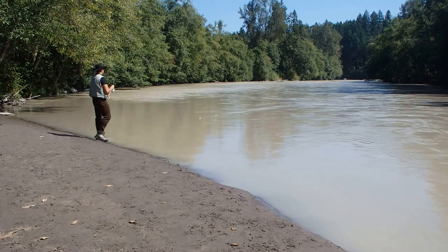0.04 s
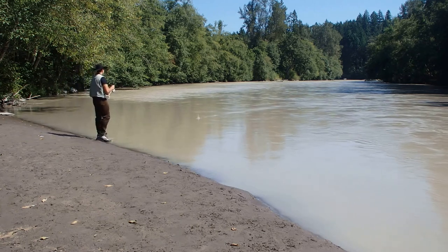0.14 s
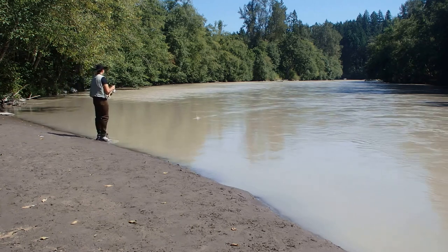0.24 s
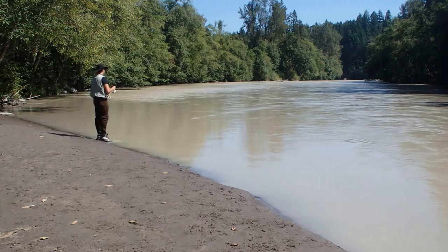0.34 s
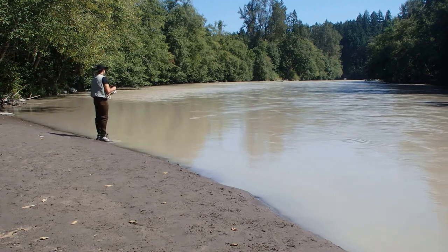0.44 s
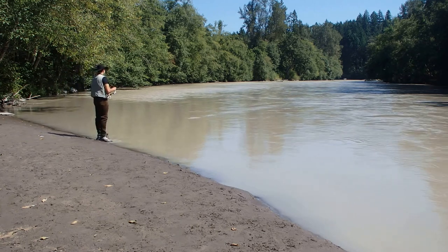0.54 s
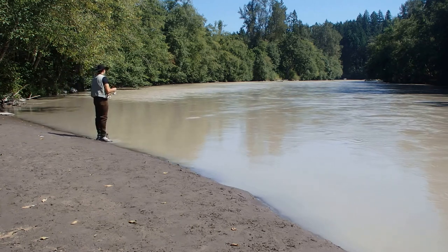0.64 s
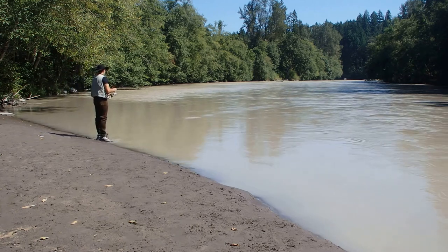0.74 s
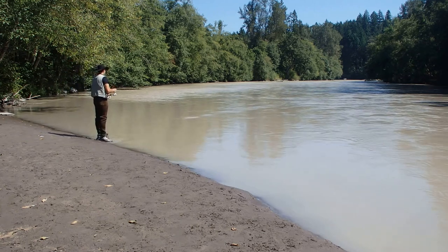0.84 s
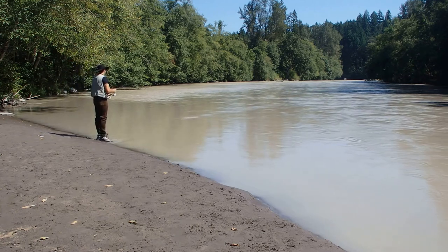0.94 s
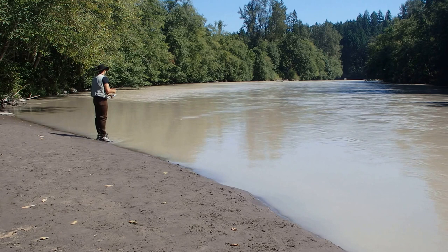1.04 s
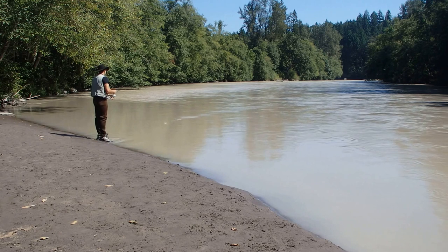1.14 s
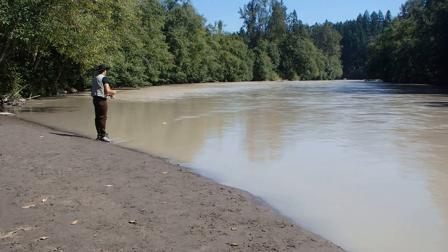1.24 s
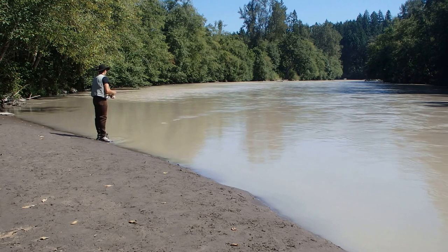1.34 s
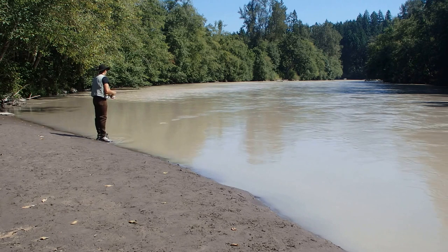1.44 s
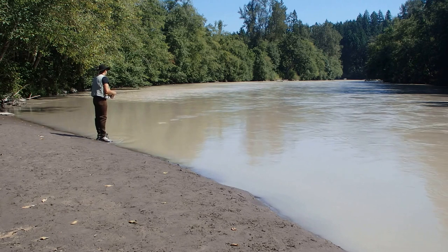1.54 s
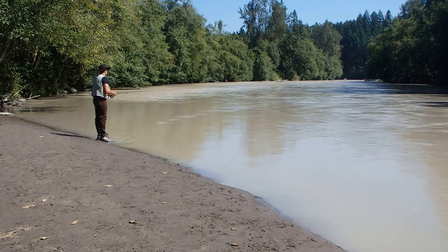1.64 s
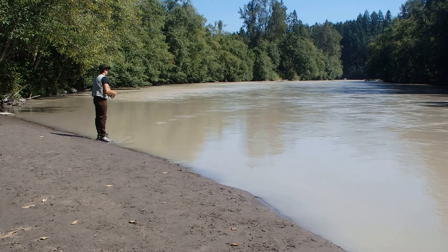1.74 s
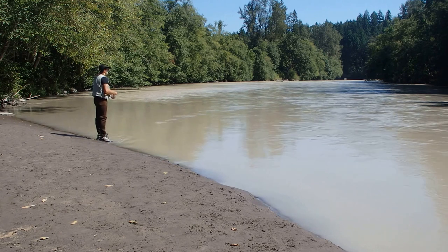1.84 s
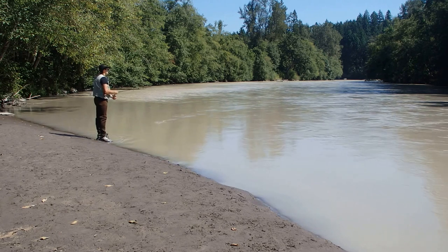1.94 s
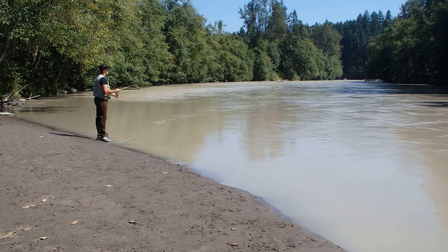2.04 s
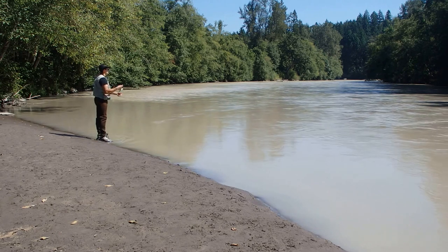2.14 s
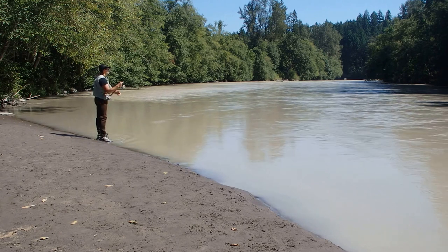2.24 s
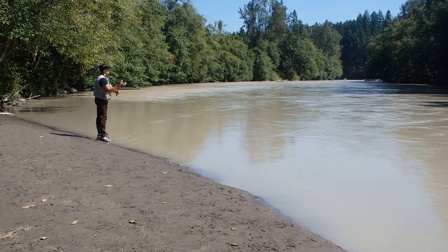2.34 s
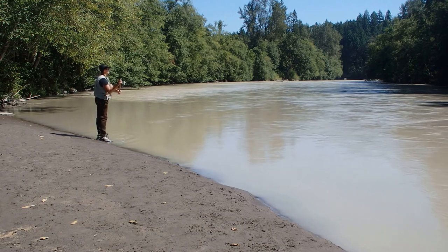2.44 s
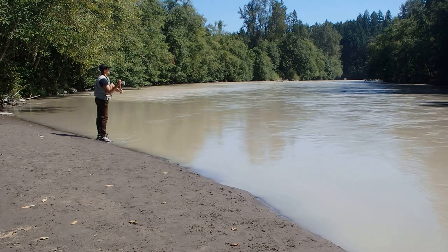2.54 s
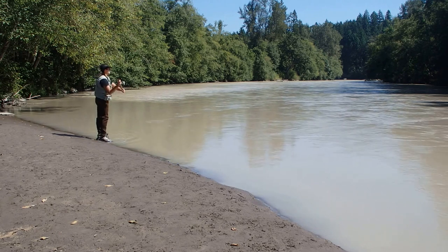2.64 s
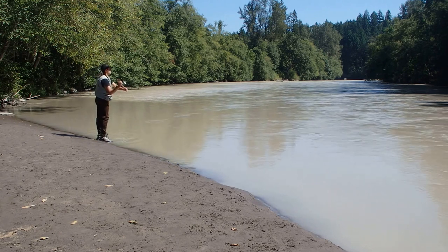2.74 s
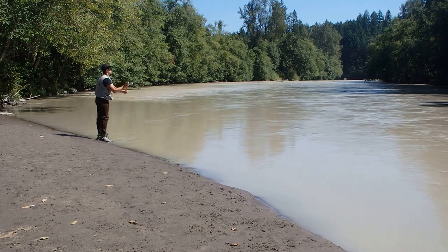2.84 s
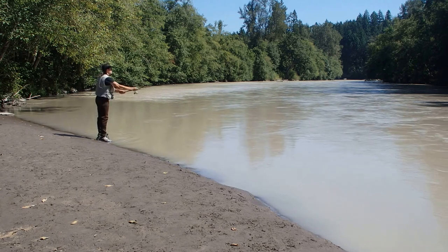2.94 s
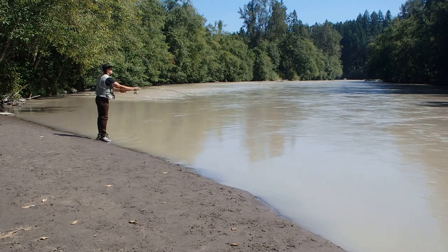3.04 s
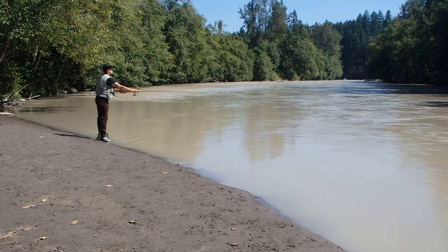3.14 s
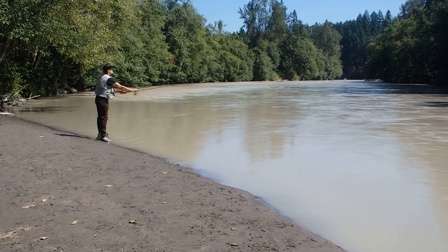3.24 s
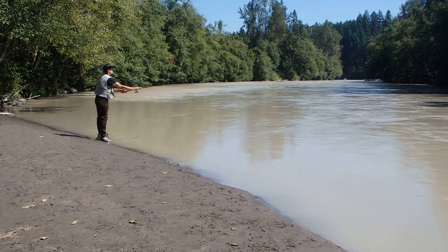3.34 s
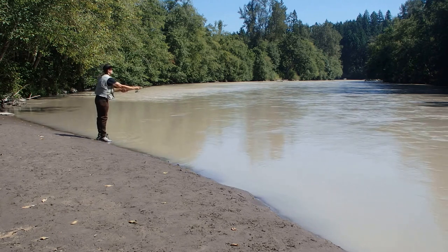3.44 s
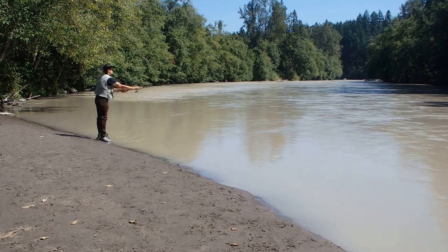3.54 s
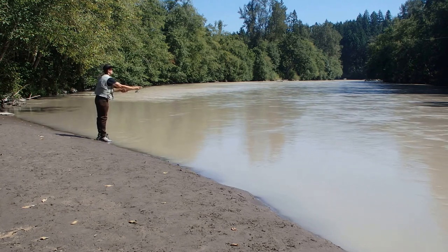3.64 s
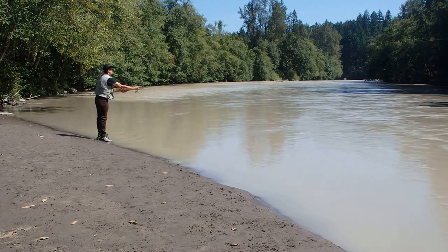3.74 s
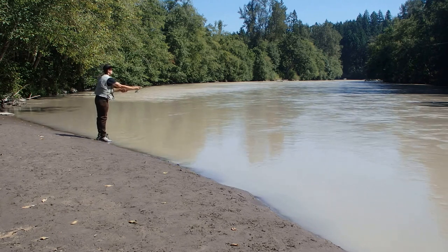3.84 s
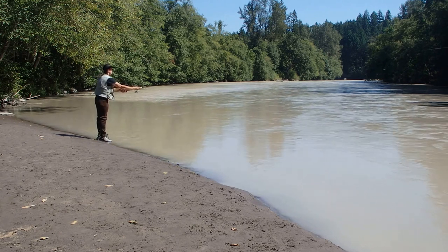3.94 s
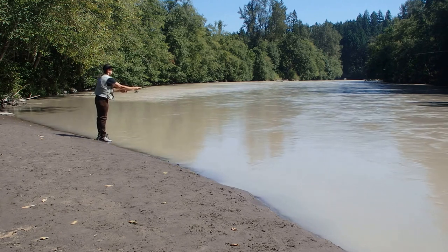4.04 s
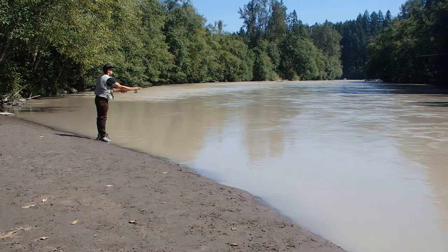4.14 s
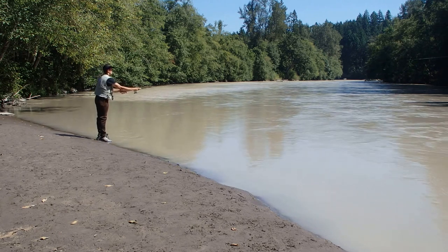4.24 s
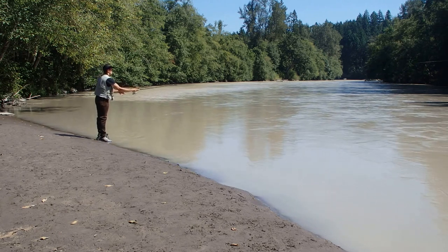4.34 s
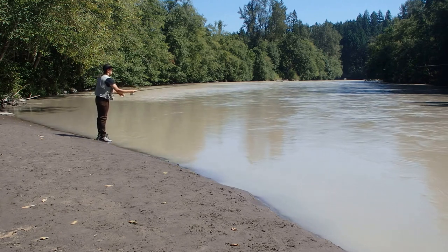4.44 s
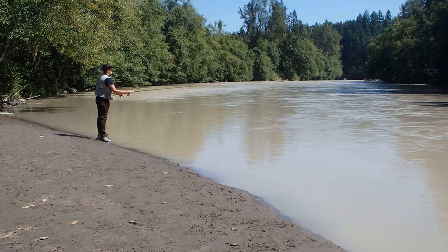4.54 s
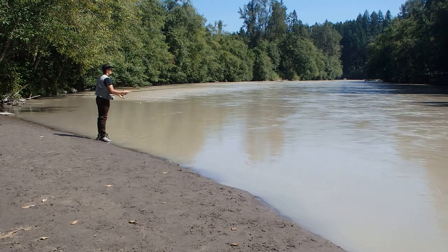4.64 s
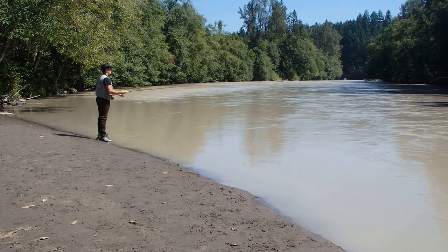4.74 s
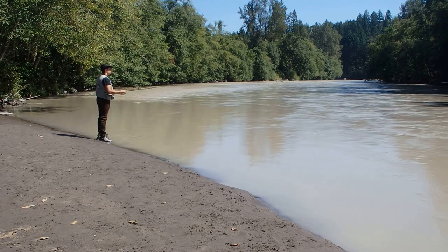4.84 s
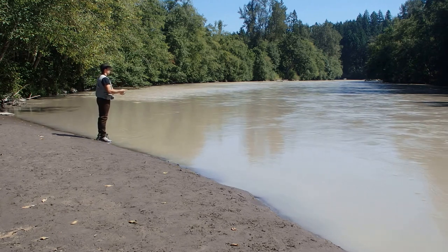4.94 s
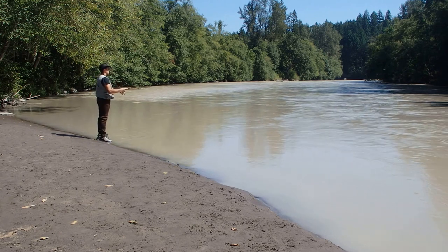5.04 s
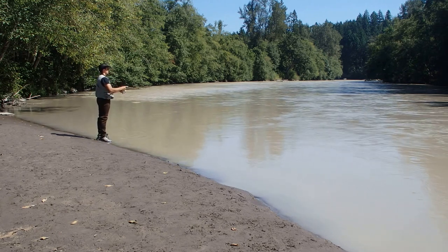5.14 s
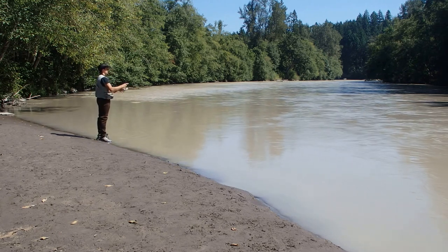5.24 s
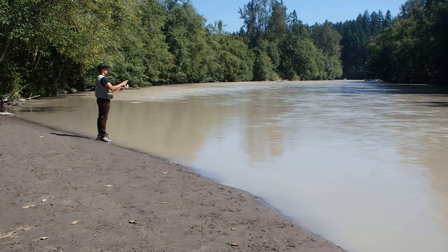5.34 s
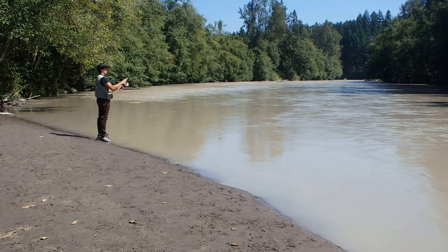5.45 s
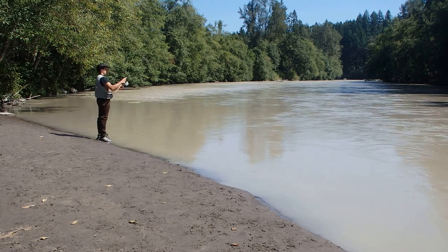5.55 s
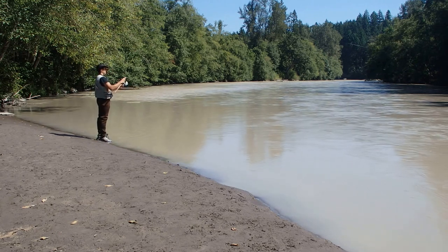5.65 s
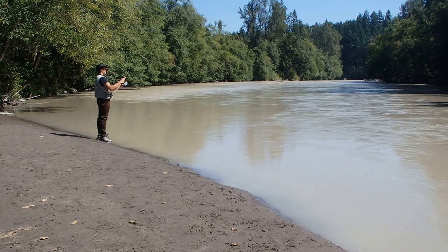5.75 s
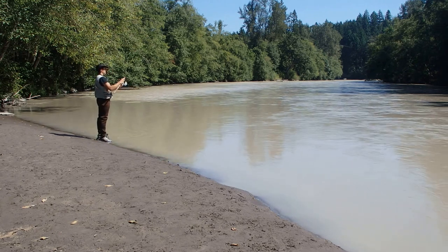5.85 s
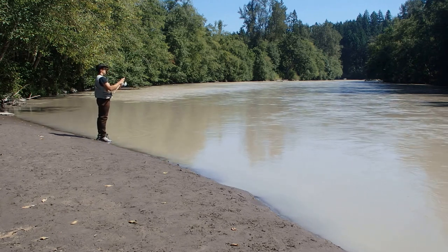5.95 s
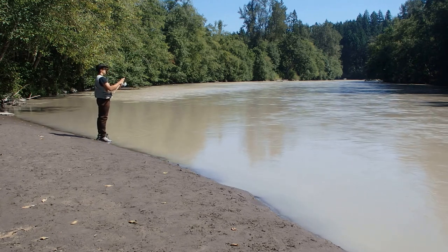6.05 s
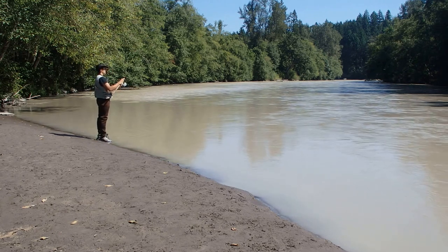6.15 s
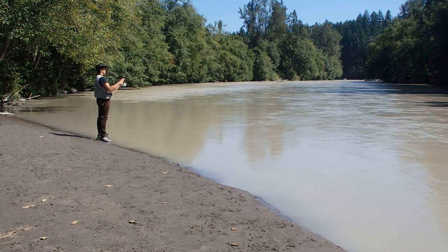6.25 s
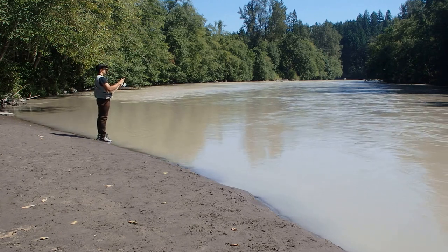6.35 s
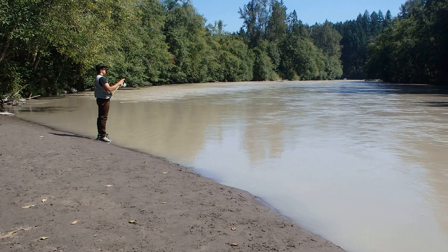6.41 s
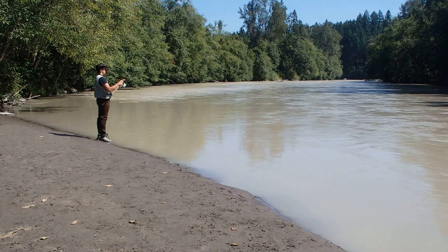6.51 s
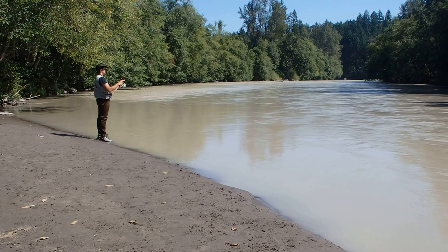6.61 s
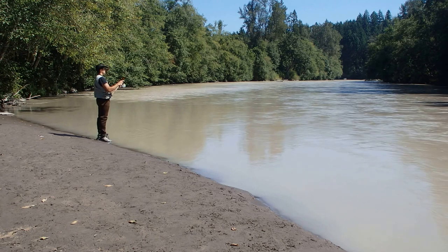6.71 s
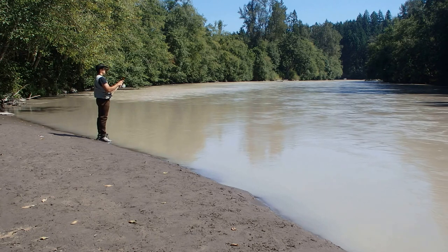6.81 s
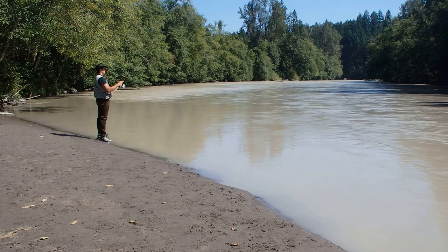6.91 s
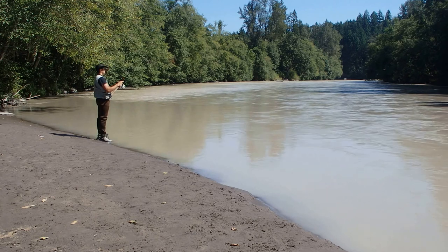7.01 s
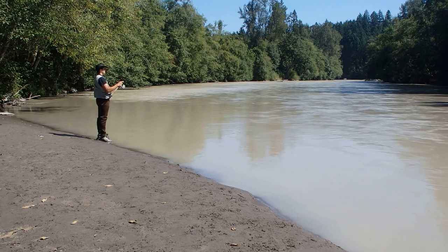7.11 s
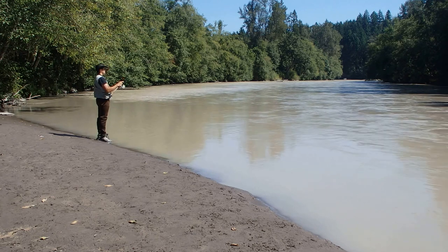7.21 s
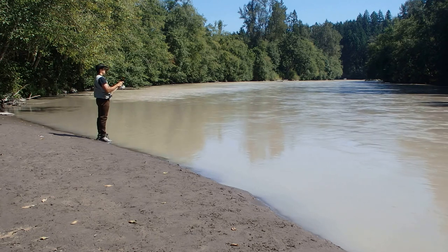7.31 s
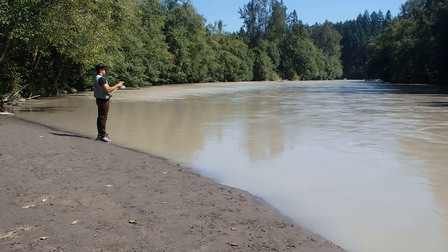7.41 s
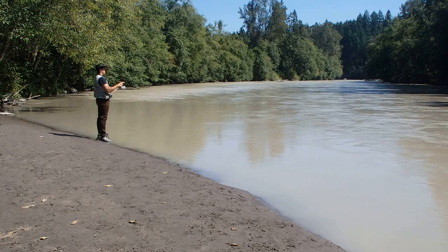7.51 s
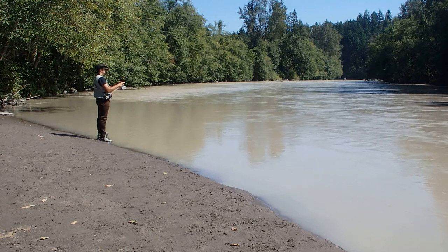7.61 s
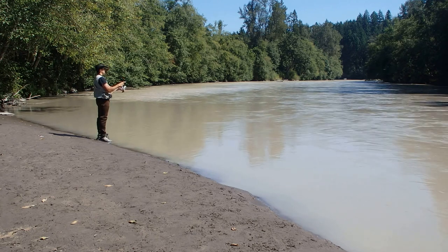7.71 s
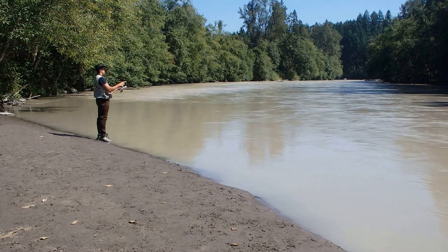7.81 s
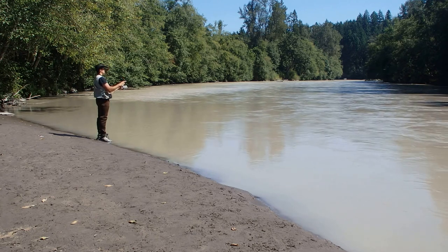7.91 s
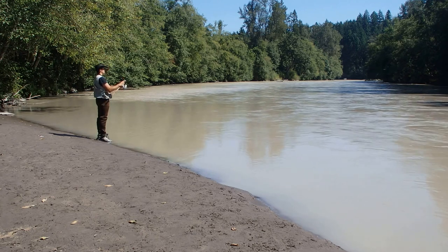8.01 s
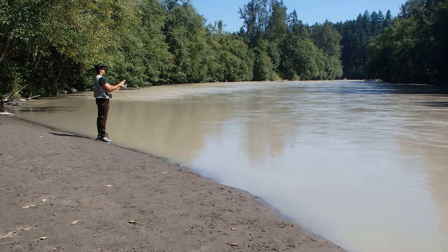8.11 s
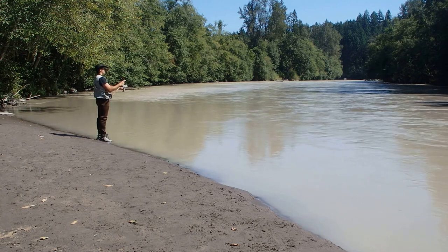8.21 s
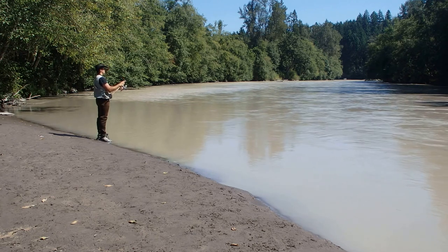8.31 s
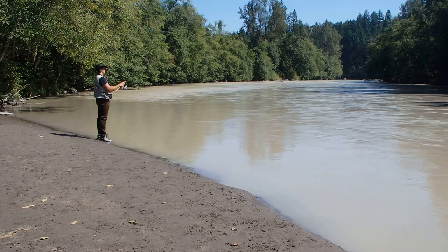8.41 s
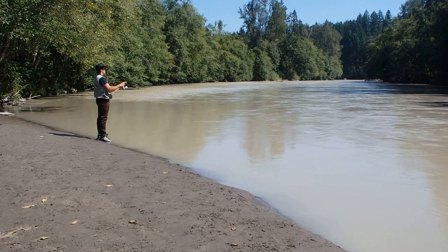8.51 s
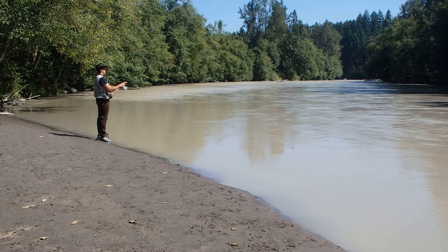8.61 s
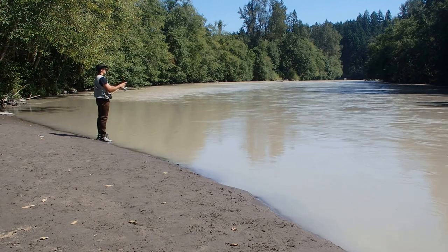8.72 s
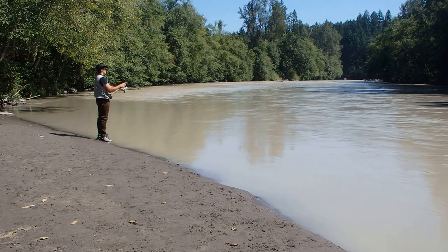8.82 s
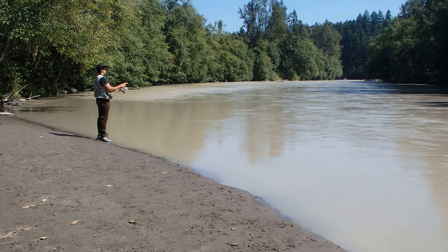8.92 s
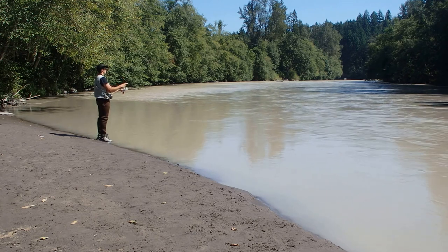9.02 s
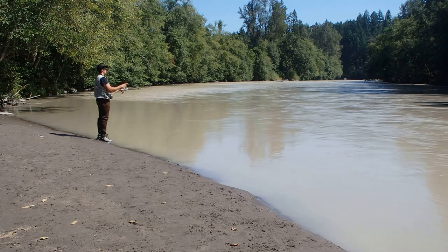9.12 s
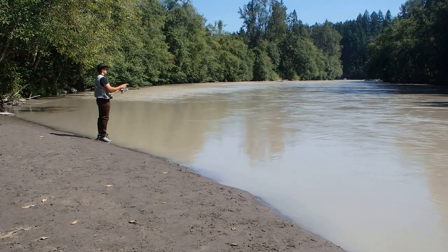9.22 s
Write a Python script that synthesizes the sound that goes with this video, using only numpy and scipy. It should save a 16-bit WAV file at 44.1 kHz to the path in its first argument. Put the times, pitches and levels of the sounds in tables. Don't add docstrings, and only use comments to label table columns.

```python
import sys
import numpy as np
from scipy import signal
from scipy.fft import rfft, irfft
from scipy.io import wavfile
from scipy.ndimage import uniform_filter1d, map_coordinates

SR = 44100
rng = np.random.default_rng(int(sys.argv[2]) if len(sys.argv) > 2 else 0)


def wav_record(signal):
    frames = np.transpose(np.atleast_2d(signal))
    bounded = np.clip(frames, -1, 1)
    quanta = np.round(bounded * 32767).astype(np.int16)
    wavfile.write(sys.argv[1], SR, quanta)


def ratio(d):
    e = np.asarray(d, float) / 20
    return 10 ** e


N = 408807


def unit(x):
    return x / np.sqrt(np.mean(x ** 2) + 1e-20)


def along(points, hz):
    f, v = np.transpose(points)
    return np.interp(np.log(hz + 1), np.log(f + 1), v)


def curves(rows):
    s, *cols = np.transpose(rows)
    return [np.interp(np.arange(N) / SR, s, c) for c in cols]


def wobble(position):
    return map_coordinates(rng.standard_normal(int(position[-1]) + 4), [position])


def coloured(x, points, delay=0):
    m = 16384
    hz = np.fft.rfftfreq(m, 1 / SR)
    fold = np.r_[1, np.full(m // 2 - 1, 2), 1, np.zeros(m // 2 - 1)]
    cepstrum = irfft(np.log(ratio(along(points, hz))), m) * fold
    response = irfft(np.exp(rfft(cepstrum) - 2j * np.pi * hz * delay / SR), m)[:m // 2]
    return signal.fftconvolve(np.atleast_2d(x), response[None], axes=1)[:, :N]


def add(track, s, sound):
    track[round(s * SR):][:len(sound)] += sound


def ring(hz, t60, attack, glide=0):
    t = np.arange(SR // 20) / SR
    return np.sin(2 * np.pi * hz * t * (1 + glide * t)) * ratio(-60 * t / t60) * (1 - np.exp(-t / attack))


def crack(t60):
    t = np.arange(SR // 20) / SR
    return rng.standard_normal(SR // 20) * ratio(-60 * t / t60)


def vortices(hz, rough, cycles_alike):
    cycles = np.cumsum(hz) / SR
    rough = np.clip(rough, 0, 1)
    eddies = unit(wobble(cycles / cycles_alike)) + 1j * unit(wobble(cycles / cycles_alike))
    strength = np.sqrt(2 - 2 * rough) + np.sqrt(rough) * eddies
    return (strength * np.exp(2j * np.pi * cycles)).real


def shedding(table, octaves, rough, cycles_alike):
    air = np.zeros(N)
    for centre, half_length, hz, db in table:
        u = np.linspace(0, 1, round(2 * half_length * SR))
        pitch = hz * 2 ** (octaves(centre, 2 * half_length) * (u - .5))
        tone = vortices(pitch, rough, cycles_alike)
        add(air, centre - half_length, ratio(db) * np.sin(np.pi * u) ** 2 * tone)
    return air


def speeding(centre, seconds):
    # t/s, rise/(octaves per s)
    rise = [(3.2, 18), (3.25, 8)]
    return seconds * np.interp(centre, *np.transpose(rise))


def engine():
    # t/s, firing tone level/dB, octave relative to it/dB
    swells = [(0, -56.5, -1.5), (.15, -53.5, 9.5), (1.2, -58, 7), (1.35, -37, -7.5), (1.55, -51.5, 2.5),
              (2.05, -42.5, -4.5), (2.55, -54, 10), (2.8, -39.5, -8), (3.5, -52.5, -3), (4.05, -39, -4),
              (4.35, -56.5, 10), (4.7, -40, -15.5), (5.3, -65.5, 5), (5.6, -42, -7.5), (6.45, -38.5, -7.5),
              (7.75, -41, -8), (8.4, -61.5, 2), (9.27, -34.5, -9.5)]
    t = np.arange(N) / SR
    firing_db, octave_db = curves(swells)
    turns = np.cumsum(76.5 + 0.79735 * wobble(3 * t)) / SR
    hum = np.zeros(N)
    for harmonic, db in [(1, firing_db), (2, firing_db + octave_db)]:
        hum += ratio(db - 2.28 + 1.2136 * wobble(6 * t)) * np.sin(2 * np.pi * harmonic * turns)
    return hum


def rush(spectrum, apart_db, patchy_db):
    z = signal.stft(rng.standard_normal((2, N)), nperseg=512)[2]
    field = uniform_filter1d(rng.standard_normal(z.shape[1:]), size=6, axis=0)
    field = uniform_filter1d(field, size=10, axis=1)
    patchy = signal.istft(z * ratio(patchy_db * unit(field)), nperseg=512)[1][:, :N]
    mid, side = coloured(patchy, spectrum)
    return unit(np.array([mid + ratio(apart_db) * side, mid - ratio(apart_db) * side]))


def drips(count, db, hz):
    water = np.zeros(N + SR)
    for when, pitch, size in rng.random((count, 3)):
        bubble_hz = hz * 5.5 ** pitch
        level = ratio(db - 4.016 * np.log(size + 0.03978))
        add(water, when * N / SR, level * ring(bubble_hz, 35 / bubble_hz, 0.000343, glide=13.406))
    return water[:N]


def river():
    # t/s, level/dB
    splashing = [
        (0, -48),
        (.8, -48),
        (2.2, -49),
        (4.5, -48.5),
        (6.3, -49),
        (6.9, -47.5),
        (8.3, -47.5),
        (9.27, -49.5),
    ]
    # f/Hz, level/(dB per Hz)
    rumble_colour = [(12, -46), (20, -5.5), (43, -8.5), (81, -1), (155, -11.5), (182, -19), (260, -23),
                     (340, -44), (570, -120)]
    current_colour = [(88, -28), (150, -2), (182, -8), (205, -8), (488, -6), (1000, -12.5), (2200, -17.5),
                      (2860, -31.5), (4840, -120)]
    fizz_colour = [(600, -44), (1100, -7), (2000, -4), (3100, -3.5), (4300, -8.5), (5500, -13.5),
                   (8000, -22.5), (16000, -34.5)]
    splash_db, = curves(splashing)
    t = np.arange(N) / SR
    rumble_db = -42 + 0.605 * wobble(4 * t)
    rumble = ratio(rumble_db) * rush(rumble_colour, apart_db=-14.5, patchy_db=0.5873)
    current_db = -44 + 0.3935 * (splash_db - splash_db.mean()) + .5 * wobble(3 * t)
    current = ratio(current_db) * rush(current_colour, apart_db=-16.0, patchy_db=0.6348)
    fizz_db = splash_db - 1.7975 + .55 * wobble(7 * t)
    fizz = ratio(fizz_db) * rush(fizz_colour, apart_db=-13, patchy_db=0.7054)
    return rumble + current + fizz + drips(count=260, db=-48, hz=802.32)


def insects():
    # centre/s, half length/s, f/Hz, level/dB
    calls = [
        (.3, .15, 5300, -58.5),
        (7.33, .2, 5375, -60),
    ]
    return shedding(calls, lambda centre, seconds: 0, rough=0.936, cycles_alike=9)


def trees(x):
    # f/Hz, gain/dB
    leaves = [(500, 7.5), (1400, 0.5), (2500, -3), (3200, 3.5), (3800, 0), (4400, 2), (5500, -0.5),
              (6500, -1.5), (11000, 2)]
    # f/Hz, t60/s
    near_decay = [(500, 0.2685), (1500, 0.1574), (3000, 0.4027), (5000, 0.1875), (10000, 0.703)]
    hz, t, z = signal.stft(rng.standard_normal((2, SR)), SR, nperseg=256)
    decay = ratio(-60 * t / along(near_decay, hz)[:, None]) + ratio(-8 - 60 * t / 1.639)
    swell = 1 + 0.347 * np.exp(-((t - .05) / 0.01346) ** 2)
    mid, side = signal.istft(z * decay * swell, SR, nperseg=256)[1]
    tail = np.array([mid + 0.0925 * side, mid - 0.1208 * side]) / np.linalg.norm(mid)
    late = np.pad(coloured(x, leaves), ((0, 0), (round(0.031 * SR), 0)))
    return ratio(-12.0) * signal.fftconvolve(late, tail, axes=1)[:, :N]


def reel():
    # t/s, peak level/dB, brightness/(dB per octave)
    contacts = [
        (5.0941, -21.5, -6.5),
        (5.0955, -28.5, 8),
        (5.099, -25.5, 8),
        (5.1035, -21, 0),
        (5.112, -30, 0),
        (5.1158, -22, 2),
        (5.2006, -32.5, -6),
    ]
    # f/Hz, level/dB, t60/s
    wire_modes = [(1474.6, -9, 0.053), (2043.3, -2.5, 0.01224), (2598, -6, 0.00609), (3300, -2.5, 0.00991),
                  (3833.3, 5, 0.005168), (4549, -14.5, 0.0063), (7200, -6, 0.0054), (9990, -15, 0.00274)]
    # f/Hz, level/dB, t60/s
    catch_modes = [(3135.8, 1.5, 0.00439), (2754, -13, 0.003424), (4000, -4, 0.004346)]
    # t/s, peak level/dB, f/Hz
    ticks = [(.279, -33, 4201), (.38, -31, 3112), (.381, -33, 4401), (.465, -31.5, 3116),
             (0.5516, -31, 3300), (0.5668, -28.5, 3856), (1.276, -33, 3893), (1.4307, -31.5, 1487),
             (1.4306, -31.5, 2865), (1.441, -35.5, 2927), (1.559, -30.5, 1975), (1.5583, -31.5, 3978),
             (1.581, -27.5, 3777), (1.611, -30.5, 4000), (1.622, -30, 1203), (1.624, -30, 1906),
             (1.627, -30, 1497), (1.787, -34, 850), (3.12, -28.5, 2121), (3.899, -32, 3910),
             (4.624, -34, 2139), (6.509, -30, 2050), (6.929, -32.5, 3023), (7.224, -32.5, 3851),
             (7.404, -32.5, 4096), (7.547, -29.5, 3185), (7.639, -33, 3978), (7.91, -42, 1151),
             (8.014, -33, 1590)]
    clicks = np.zeros(N)
    for s, db, bright_db in contacts:
        contact = ratio(-5.5 + bright_db) * crack(0.00397)
        for hz, level, t60 in wire_modes:
            contact += ratio(level + bright_db * np.log2(hz / 3000)) * ring(hz, t60, .0001)
        add(clicks, s, ratio(db - 5.0) * contact)
    for hz, level, t60 in catch_modes:
        add(clicks, .5592, ratio(-16.5 + level) * ring(hz, t60, attack=0.000378))
    for s, db, hz in ticks:
        mode = ring(hz, 30.056 / hz, attack=0.000423, glide=2.74)
        add(clicks, s, ratio(db) * (mode + ratio(-5.5) * crack(0.00398)))
    return clicks


def line():
    # t/s, level/dB, f/Hz
    back_swing = [
        (2.52, -66, 9363),
        (2.56, -52.5, 9543),
        (2.63, -64.5, 10590),
        (2.69, -53.5, 9511),
        (2.8, -49.5, 9857),
        (2.9, -50, 9488),
        (2.99, -51.5, 10440),
        (3.06, -51.5, 9200),
        (3.16, -52.5, 9621),
    ]
    # centre/s, half length/s, f/Hz, level/dB
    losing_speed = [
        (2.82, 0.04404, 9375, -44.5),
        (2.94, 0.0304, 6717, -52.5),
        (2.985, 0.05434, 6480, -48.5),
        (3.118, 0.023, 10080, -47.5),
        (3.236, 0.0089, 6270, -21.5),
        (3.241, 0.01896, 5095, -22),
    ]
    db, hz = curves(back_swing)
    t = np.arange(N) / SR
    span = slice(round(back_swing[0][0] * SR), round(back_swing[-1][0] * SR))
    whistle = vortices(hz[span], 0.9224, cycles_alike=3.1)
    broad_wake = ratio(-2.5) * vortices(.9 * hz[span], 1, cycles_alike=1.2)
    air = np.zeros(N)
    air[span] = (whistle + broad_wake) * signal.windows.tukey(span.stop - span.start, alpha=.1)
    gusts_db = 3.2648 * wobble(25 * t)
    slowing = shedding(losing_speed, lambda centre, seconds: -.25, rough=0.75, cycles_alike=3.5)
    return ratio(db + 0.5 + gusts_db) * air + slowing


def wake():
    # centre/s, half length/s, f/Hz, level/dB
    patches = [
        (3.18, 0.049, 7015, -42),
        (3.185, 0.048, 3490, -41),
        (3.205, .03, 1291, -28.5),
        (3.226, .029, 7945, -31),
        (3.265, .05, 1800, -33),
        (3.27, .1, 7329, -40.5),
    ]
    return shedding(patches, lambda *row: .25 * speeding(*row), rough=0.9655, cycles_alike=1.1)


def rod(blur):
    # centre/s, half length/s, f/Hz, level/dB
    sections = [
        (3.191, .012, 1202, -28),
        (3.203, .013, 1565, -22.5),
        (3.212, .008, 2900, -19),
        (3.221, .016, 3990, -20.5),
        (3.2234, .03, 1890, -23.5),
        (3.227, .011, 5395, -12.5),
        (3.254, .015, 3970, -31.5),
    ]
    # centre/s, half length/s, f/Hz, level/dB
    whistles = [
        (3.177, .01, 759.2, -34),
        (3.213, .009, 2400, -18.5),
        (3.224, .007, 2888, -15),
        (3.2315, .004, 3836, -11.5),
        (3.2415, .0109, 2797, -18),
        (3.253, .011, 3251, -21.5),
    ]
    locked = shedding(whistles, lambda centre, seconds: 8.882 * seconds, max(0.316, blur), cycles_alike=2.1384)
    rising = shedding(sections, speeding, max(0.9054, blur), cycles_alike=1.8 - .5 * blur)
    return rising + locked


def scene():
    background = engine() + river() + insects()
    gear = reel()
    air = wake() + line()
    echoes = trees(rod(blur=0.88516) + air + 0.636 * gear)
    return background + echoes + gear + air + rod(blur=0)


def roll_off(x):
    return signal.sosfilt(signal.butter(12, 15880, fs=SR, output="sos"), x)


def record(dry):
    # f/Hz, gain/dB
    resonance = [(30, 0.5), (2300, 0), (2700, 2), (3000, 4), (3250, 5), (3550, -3.5), (3750, -0.5),
                 (4250, 3), (4700, 2), (5100, 0.5), (7500, -3), (9500, 1), (11500, -2), (14000, -10.5)]
    # f/Hz, gain/dB
    shade = [(40, -1), (150, -1.4648), (700, -0.3084), (2400, 0), (3000, 1.1995), (3450, 1.5), (4100, 0.5),
             (4600, -3), (5000, -5.5), (5500, -16), (6200, -13.5), (7500, -23), (9500, -22), (12000, -8)]
    # f/Hz, level/(dB per Hz)
    hiss_colour = [(100, 6), (1000, -6.5), (5000, 0.5), (12800, 2.5), (15000, 2), (15800, -11)]
    left, right = coloured(dry, resonance)
    ports = np.vstack([np.roll(left, 4), coloured(right, shade, delay=3.5258)])
    noise = rng.standard_normal((2, N))
    hiss = ratio(-52.0) * unit(coloured(noise, hiss_colour + [(15880, -60)]))
    return roll_off(ports + hiss)


dry = scene()
out = record(dry)
wav_record(out)
```